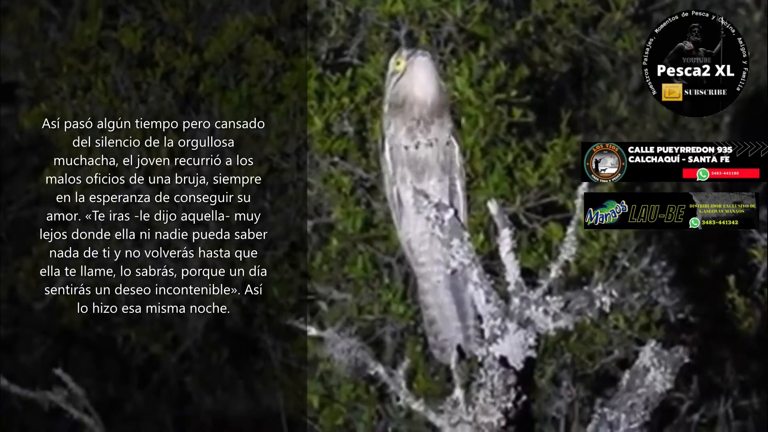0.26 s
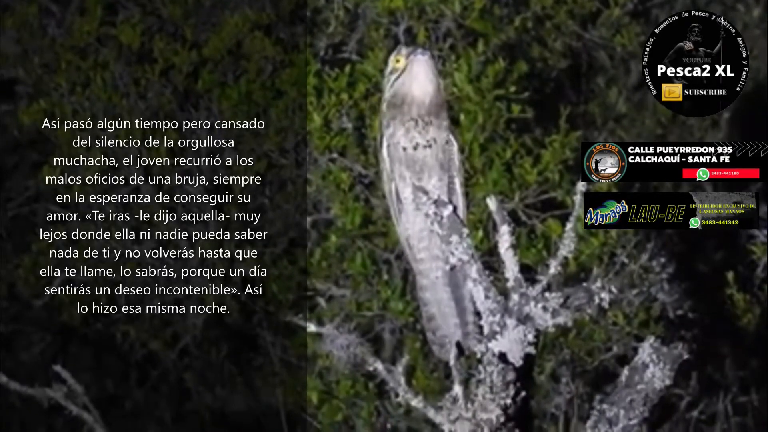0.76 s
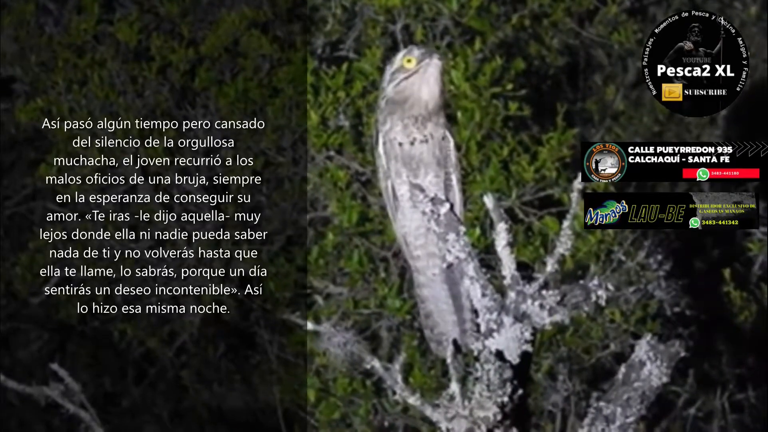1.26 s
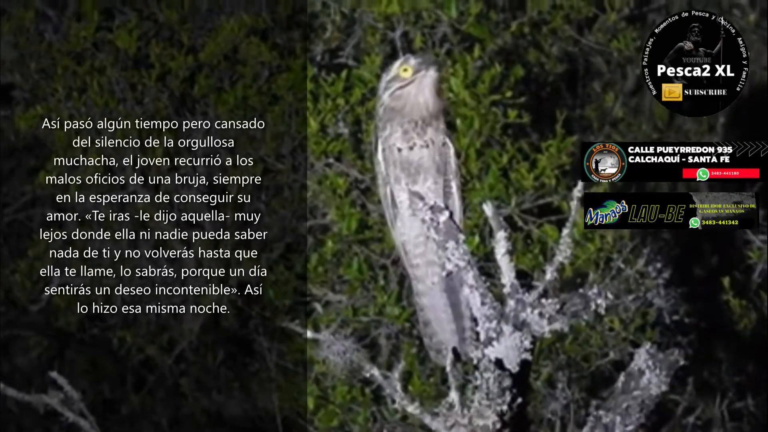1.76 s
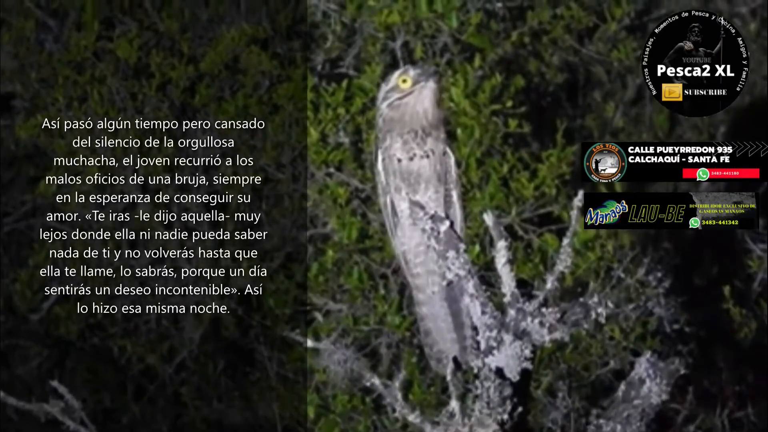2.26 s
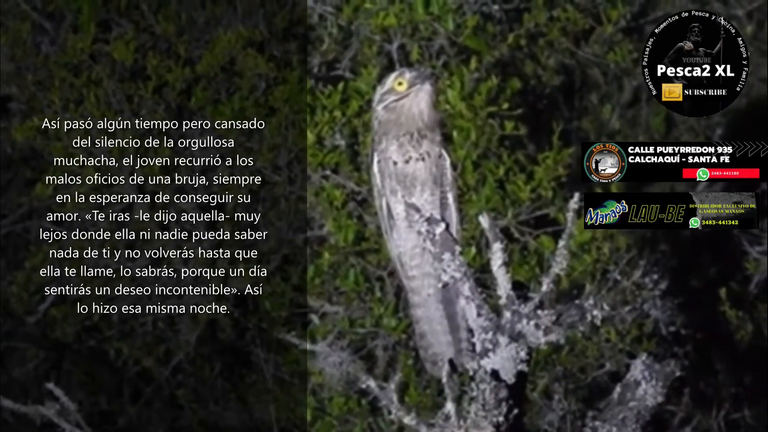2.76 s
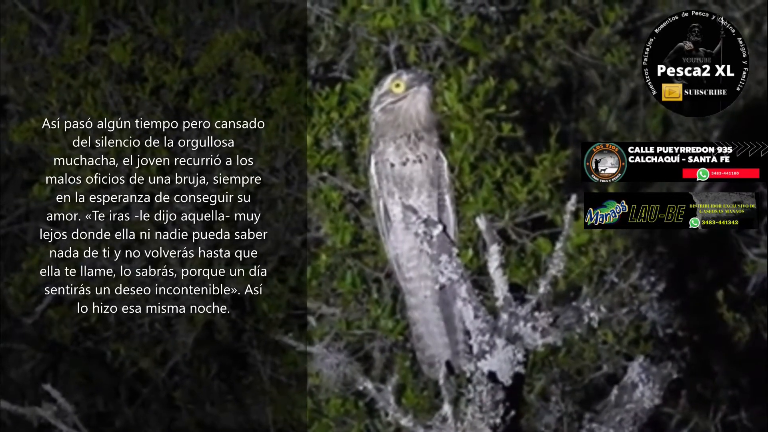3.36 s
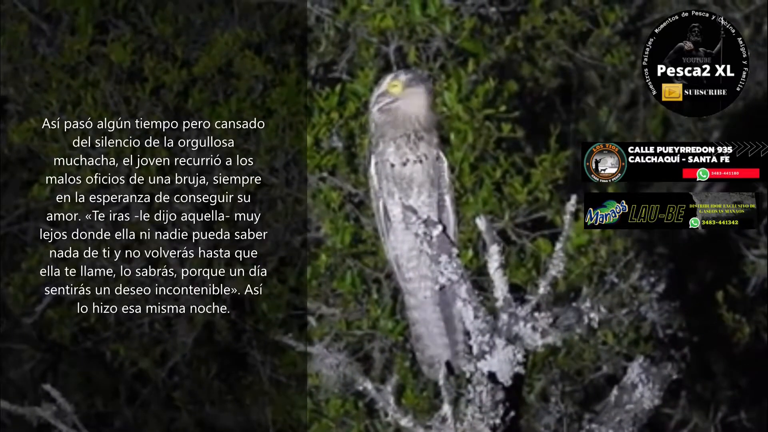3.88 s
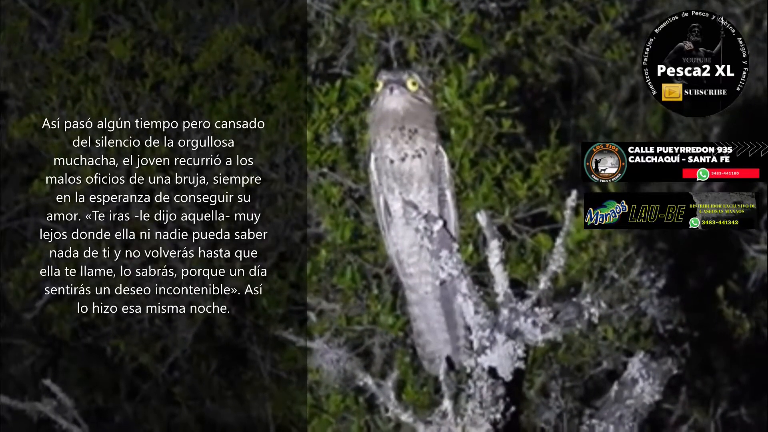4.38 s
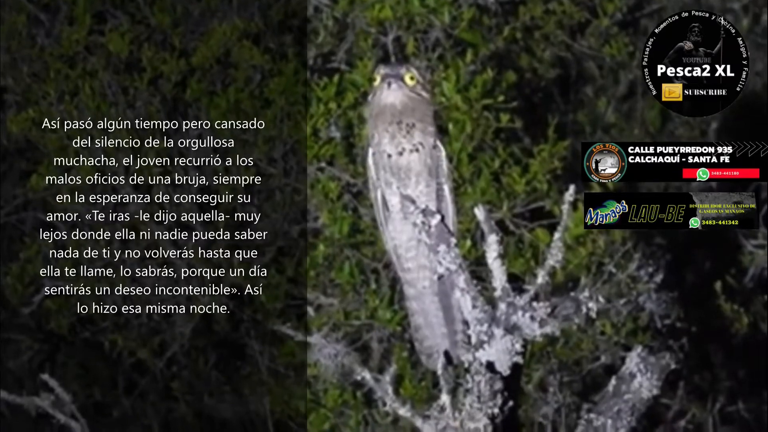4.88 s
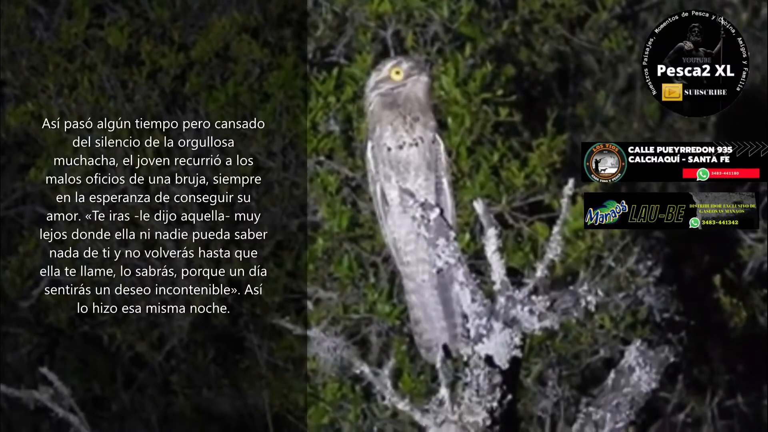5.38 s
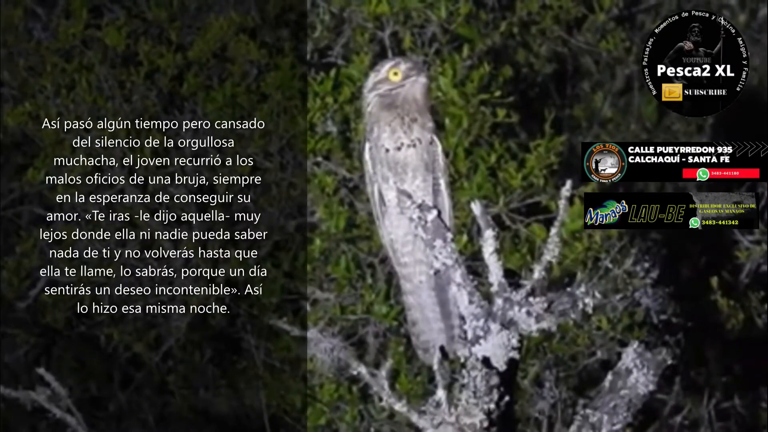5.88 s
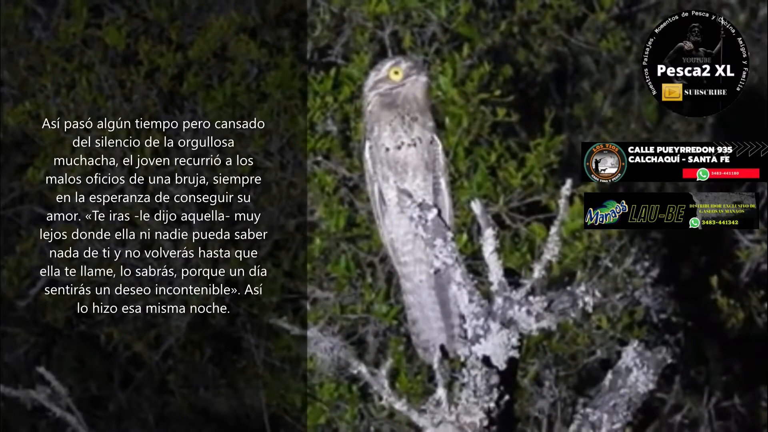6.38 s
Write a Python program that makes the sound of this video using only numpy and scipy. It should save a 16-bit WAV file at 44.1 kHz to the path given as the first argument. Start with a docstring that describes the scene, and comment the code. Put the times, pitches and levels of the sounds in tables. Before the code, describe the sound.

Outdoors at night, a bird gives three clear, nearly pure whistles descending in steps during the first second and a half, the first already sounding at the start and loudest. Faint gulping scoops precede the second and third. Bright crickets chirp quickly throughout, about six short pulsing bursts a second, over a dense far chorus. Barely audible low hoots come later. Stereo microphone in open woodland, with slight tree echo.

```python
"""A night bird whistles three falling notes in a wood: nearly pure sliding tones, with faint gulping
scoops before the second and third, and trees that send the sound back.
Crickets chirp in short tones, one for each wing stroke; shaped noise makes the farther chorus.
A distant owl-like bird hoots and purrs in low tones with soft pulses. Filtered noise makes the night
hiss, wind rumble, low wash and faint far singers; short pulses make one dull knock and treble flickers."""
import sys
import numpy as np
from scipy import signal
from scipy.io import wavfile
from scipy.ndimage import uniform_filter1d

SR = 44100
rng = np.random.default_rng(int(sys.argv[2]) if len(sys.argv) > 2 else 0)


def waveform_to_disk(signal):
    """Save audio, clipped to [-1, 1], as 16-bit WAV at the path in sys.argv[1]."""
    frames = np.transpose(np.atleast_2d(signal))
    scaled = np.clip(frames, -1, 1) * 32767
    samples = np.round(scaled).astype(np.int16)
    wavfile.write(sys.argv[1], SR, samples)


N = 292383  # length in samples

# Held part of each whistled note: (t/s, f/Hz, rms level/dB)
HELD_NOTES = [
    [(0.0, 894, -19), (0.026, 882, -18), (0.136, 916, -21), (0.213, 914, -19.5)],
    [(0.434, 744, -32), (0.462, 748, -30.5), (0.606, 750.7, -29.5), (0.66, 757, -32), (0.774, 730, -32),
     (0.823, 761, -32)],
    [(1.076, 640, -33), (1.226, 647, -33.5), (1.47, 606, -39), (1.503, 603, -39)],
]
# Swell into every note: (t/s from the start of the held part, pitch factor, level change/dB)
NOTE_SWELL = [(-.044, .975, -23), (-.03, .985, -10), (-.015, .995, -3)]
# Downward break after every note: (t/s from the end of the held part, pitch factor, level change/dB)
NOTE_BREAK = [(.008, .95, -3.5), (.015, .87, -10.5), (0.02, .84, -40)]
# How far each note breaks downward: (share of the common drop), one per note
BREAK_DEPTHS = [.45, 1.33, 0.73]
# Octave above each note, compared with the note at its loudest: (level/dB), one per note
NOTE_OCTAVES = [-65.5, -33.5, -29.5]
# Faint scoops before notes: (start t/s, length/s, reference f/Hz, level change/dB)
SCOOPS = [(0.31, 0.089, 739, 0.5), (0.941, .097, 625, -0.5)]
# Shape of a scoop, a gulp then a thin rise: (share of length, share of reference f, level before flutter/dB)
SCOOP_SHAPE = [(0, 0.4, -59), (.08, 0.43, -48.5), (.24, 0.52, -48.5), (.33, .6, -62), (.5, .76, -65),
               (.6, 0.82, -48), (.75, .9, -58), (1, 0.94, -52.5)]
# Tree trunks throw the whistle back: (delay t/s, level/dB)
TRUNK_ECHOES = [(.075, -26), (.12, -38), (.18, -43)]

# Very distant insects and frogs: (f/Hz, bandwidth/Hz, rms level/dB, rough burst rate/Hz)
FAINT_SINGERS = [(7500, 85, -52, 14), (4065, 130, -67, 12), (3820, 300, -70, 10), (1040, 170, -68, 10),
                 (675, 200, -70, 10)]
# How alike noise is at the two ears: (f/Hz, likeness from 0 to 1)
EAR_LIKENESS = [(30, .5), (120, .1), (500, .55), (1000, .6), (2000, .5), (4000, .3), (6800, .65),
                (7700, .75), (9000, .75)]
# Colour of the night hiss: (f/Hz, relative level/dB)
AIR_COLOUR = [(60, -20), (100, -34.5), (140, 2), (200, 3.5), (500, -3), (890, -2), (1240, -3.5), (1690, 1),
              (1950, -3), (2250, -3), (2850, -5.5), (3500, -1.5), (4100, 1.5), (5500, -9.5), (8500, -23),
              (12000, -15.5), (15500, -23)]
# Colour of light wind on the microphone: (f/Hz, relative level/dB)
WIND_COLOUR = [(10, -2), (30, -12), (70, -6), (110, -9.5), (150, -0.5), (250, -37)]
# The wind drops and returns: (t/s, level/dB)
WIND_LEVEL = [(0, -66), (1.4, -66.5), (1.8, -73.5), (5.2, -76), (5.6, -75.5), (6.63, -72)]
# Colour of the countless far crickets: (f/Hz, relative level/dB)
CHORUS_COLOUR = [(2650, -68), (4500, -40.5), (6010, -20.5), (6400, -9), (6670, -7.5), (6870, -3.5),
                 (7150, -6), (7430, -16), (7760, -21), (8600, -44.5), (11200, -84), (18900, -120)]
# Colour of a lower insect rasp on the left: (f/Hz, relative level/dB)
RASP_COLOUR = [(3500, -44.5), (4500, -20), (5200, -4), (5800, 3.5), (6300, 1), (6650, 3.5), (7000, -12),
               (8000, -57.5)]

# Near cricket's chirps: (t/s of first full wing stroke, number of full strokes, base level/dB)
CHIRPS = [(0.0709, 4.74, -20.5), (0.2318, 5.5, -21.5), (0.3906, 4.83, -19), (0.557, 4.8, -20),
          (0.7323, 4.8, -22), (0.9008, 5.1, -20.5), (1.0673, 4.9, -20.5), (1.23, 6.2, -23),
          (1.4935, 4.86, -21), (1.6683, 5.5, -23), (1.8509, 5.6, -22), (2.0405, 5.1, -20),
          (2.216, 4.7, -21), (2.3922, 5.03, -20.5), (2.5671, 5.06, -20.5), (2.735, 6.4, -22.5),
          (2.91, 4.8, -20.5), (3.093, 4.5, -21), (3.2749, 4.7, -21.5), (3.4516, 5.7, -20.5),
          (3.6109, 6.1, -20.5), (3.7931, 4.65, -21), (3.9611, 5, -22), (4.1288, 5.4, -21.5),
          (4.3034, 6.2, -21), (4.485, 6, -21), (4.668, 4.7, -22.5), (4.8276, 5.5, -21.5),
          (4.987, 5.05, -19), (5.1612, 5.95, -22), (5.3363, 5.5, -21.5), (5.4951, 4.93, -20),
          (5.6703, 6.3, -21.5), (5.8523, 4.2, -22), (6.0203, 5.6, -19.5), (6.2024, 6.2, -21),
          (6.384, 4.87, -20.5), (6.5588, 5.1, -21.5)]
# One wing stroke, whose wing file slows at the end: (t/s, f/Hz before pitch factors, relative level/dB)
WING_STROKE = [(-.0043, 7070, -14), (-.003, 7010, -2.5), (0, 6900, 0), (.002, 6710, -2), (.0036, 6430, -7),
               (.0052, 5950, -16)]
# Neighbours in loose step: (lag t/s, looseness/s, pitch factor, base level/dB, left-right level/dB, left lead/s)
NEIGHBOURS = [(-.025, .03, .985, -27, -1.5, .000066), (.08, .03, 1.005, -31.5, -2.5, -.00001)]

# One dull knock and very short treble flickers: (t/s, level/dB, f/Hz)
SHORT_PULSES = [(4.588, -33, 710), (.2577, -22.5, 12050), (1.107, -30, 12000), (2.738, -31, 12000),
                (4.016, -30, 11900), (5.551, -34, 12000), (5.906, -31.5, 12000)]
# Distant hoots and purrs: (start t/s, length/s, base f/Hz, rms level before the tail/dB, purr from 0 to 1)
HOOTS = [(1.552, 0.051, 334, -58, 0.9), (1.796, 0.135, 342.6, -54.5, 0.13), (3.355, 0.046, 496, -59.5, 0.2),
         (3.427, 0.15, 350, -61.5, 1), (3.605, 0.053, 354, -59, 0.4), (3.839, 0.12, 338.6, -52, 0.05),
         (3.949, 0.08, 348, -62.5, 0.6), (5.636, 0.036, 347, -60, 0.4), (5.701, 0.125, 354, -60.5, 0.84),
         (5.978, 0.14, 340, -55, 0), (6.131, 0.038, 353, -61, 0.2)]
# Colour of the low wash: (f/Hz, relative level/dB)
WASH_COLOUR = [(250, -29.5), (420, 2), (700, 6), (1100, 6.5), (1500, -19.5), (3000, -60.5)]
# The wash rises and fades: (t/s, level/dB)
WASH_LEVEL = [(3.25, -76), (3.4, -57), (3.65, -59), (3.85, -64), (5.1, -62), (5.9, -72), (6.2, -76)]

AIR_DB, AIR_CHANGE_DB, AIR_EASE_S = -53, -3, 0.069  # hiss level, brief level change, time to ease
CHORUS_DB, RASP_DB = -35.5, -41.5
CHORUS_SWELL_DB, CHORUS_BLUR_S = 0.5, 0.062  # swing of the swell, time to ease
STROKE_S = .01445  # seconds from one wing stroke to the next
OPENING_DB = -8  # first stroke against the chirp's base level
STROKE_SPREAD_DB = 1.2  # chance in the strength of single strokes
THROBS_PER_S = 33.3  # soft pulses in a purr
EDGE_HZ = 15750  # the recorder's upper limit


def amp(db):
    """Turns decibels into a plain multiplier."""
    return 10 ** (np.asarray(db) / 20)


def evened(x):
    """Scales a sound to an rms strength of one."""
    return x / np.sqrt(np.mean(x ** 2) + 1e-20)


def read(points, hz):
    """Reads a curve between its points, along a logarithmic frequency scale."""
    f, value = np.transpose(points)
    return np.interp(np.log(hz + 1), np.log(f + 1), value)


def along(curve):
    """Turns a level curve into a multiplier for every sample."""
    s, db = np.transpose(curve)
    return amp(np.interp(np.arange(N) / SR, s, db))


def add(mix, s, sound):
    """Adds a sound at time s, cutting off what falls outside the mix."""
    at = round(s * SR)
    sound = sound[..., max(-at, 0):]
    part = mix[..., max(at, 0):][..., :sound.shape[-1]]
    part += sound[..., :part.shape[-1]]


def narrow_noise(width, size):
    """Complex noise that wanders slowly, in a band about width Hz wide around zero."""
    r = np.exp(-np.pi * width / SR)
    raw = [1, 1j] @ rng.standard_normal((2, size))
    z = signal.lfilter([1], [1, -2 * r, r * r], raw)
    return z / np.sqrt(np.mean(abs(z) ** 2))


def hiss(spectrum, patchy_db, lead_s):
    """Two-channel noise from random short spectra with drifting patches; left leads by lead_s."""
    frames, hz = N // 256 + 5, np.fft.rfftfreq(1024, 1 / SR)
    a, b, c, d, patches = rng.standard_normal((frames, 513, 5)).T
    patches = uniform_filter1d(patches, size=10, axis=0)  # smooth over frequency
    patches = evened(uniform_filter1d(patches, size=10, axis=1))  # then over time
    same = np.clip(read(EAR_LIKENESS, hz), -1, 1)[:, None]
    late = np.exp(-2j * np.pi * hz * lead_s)[:, None]
    left = a + 1j * b
    right = same * late * left + np.sqrt(1 - same ** 2) * (c + 1j * d)
    z = np.array([left, right])
    z *= amp(read(spectrum, hz)[:, None] + patchy_db * patches)
    noise = signal.istft(z, nperseg=1024, noverlap=768)[1]
    return evened(noise[:, :N])


def scatter(x, t60, start_s):
    """Leaves and trunks return a fading tail, different at each ear; it falls 60 dB in t60 seconds."""
    t = np.arange(SR // 2) / SR
    taps = rng.standard_normal((2, len(t))) * amp(-60 * t / t60) * (t > start_s)
    return signal.fftconvolve(x[None], taps / np.linalg.norm(taps[0]), axes=1)[:, :N]


def note(held, depth):
    """Puts the common swell before a held note and the downward break after it."""
    first, last = held[0], held[-1]
    swell = [(first[0] + s, first[1] * factor, first[2] + db) for s, factor, db in NOTE_SWELL]
    fall = [(last[0] + s, last[1] * factor ** depth, last[2] + db) for s, factor, db in NOTE_BREAK]
    return swell + held + fall


def whistle(rows, octave_db, breathy):
    """A sliding pure tone with an octave that grows with loudness; breathy tones flutter."""
    s, hz, db = np.transpose(rows)
    t = np.arange(s[0], s[-1], 1 / SR)
    turn = np.exp(2j * np.pi * np.cumsum(np.interp(t, s, hz)) / SR)
    flutter = 1 - breathy + breathy * narrow_noise(170, len(t))
    level = amp(np.interp(t, s, db))
    octave = amp(octave_db) * level / level.max() * turn ** 2  # squaring doubles the pitch
    return s[0], np.sqrt(2) * level * (flutter * turn + octave).imag


def night_bird():
    """Whistled notes and scoops ring among trees, with separate echoes and a scattered tail."""
    dry = np.zeros(N)
    for rows, octave_db, depth in zip(HELD_NOTES, NOTE_OCTAVES, BREAK_DEPTHS):
        add(dry, *whistle(note(rows, depth), octave_db, breathy=0.017))
    for s, length_s, hz, scoop_db in SCOOPS:
        rows = [(s + share * length_s, part * hz, db + scoop_db) for share, part, db in SCOOP_SHAPE]
        add(dry, *whistle(rows, octave_db=-14, breathy=.5))
    out = dry * amp([[-.3], [.3]])  # slightly to the right
    out += amp(-34.0) * scatter(dry, t60=0.78, start_s=0.017)
    for delay_s, db in TRUNK_ECHOES:
        add(out, delay_s, amp(db) * dry)
    return out


def faint_singers():
    """Wavering narrow bands of noise come and go in uneven bursts, partly alike at both ears."""
    out, t = np.zeros((2, N)), np.arange(N) / SR
    for hz, width, db, per_s in FAINT_SINGERS:
        bursts = np.maximum(narrow_noise(per_s, N).real + 1.25, 0)
        carrier = np.exp(2j * np.pi * hz * t)
        one = (narrow_noise(width, N) * carrier).real
        other = (narrow_noise(width, N) * carrier).real
        out += amp(db) * evened(bursts * np.array([one, 0.87 * one + 0.17 * other]))
    return out


def air():
    """Coloured noise makes the night hiss; its level changes briefly a few times."""
    t = np.arange(N) / SR
    spans = sum((t >= held[0][0]) * (t < held[-1][0]) * 1. for held in HELD_NOTES)
    change_db = AIR_CHANGE_DB * uniform_filter1d(spans, round(AIR_EASE_S * SR))
    return amp(AIR_DB + change_db) * hiss(AIR_COLOUR, patchy_db=1.87, lead_s=0)


def wind():
    """Low noise makes the rumble of light wind, which drops and returns."""
    return along(WIND_LEVEL) * hiss(WIND_COLOUR, patchy_db=0.5, lead_s=0)


def chorus():
    """Many far crickets blur into noise that swells with the near chirps; a lower rasp joins in."""
    t = np.arange(N) / SR
    chirping = sum((t >= s - STROKE_S) * (t < s + STROKE_S * strokes) * 1. for s, strokes, _ in CHIRPS)
    swell_db = CHORUS_SWELL_DB * (uniform_filter1d(chirping, round(CHORUS_BLUR_S * SR)) - .5)
    far = amp(CHORUS_DB + swell_db) * hiss(CHORUS_COLOUR, patchy_db=2.0, lead_s=.000005)
    rasp = amp(RASP_DB) * hiss(RASP_COLOUR, patchy_db=1.56, lead_s=.000055)
    return far + rasp


def stroke(pitch, phase, lead_s):
    """One wing stroke is a short tone sliding down; its waves reach the left ear lead_s early."""
    s, hz, db = np.transpose(WING_STROKE)
    t = np.arange(s[0], s[-1], 1 / SR)
    level = amp(uniform_filter1d(np.interp(t, s, db), size=30))
    level *= signal.windows.tukey(len(t), .3)  # soft ends
    f = pitch * np.interp(t, s, hz)
    turn = 2 * np.pi * (np.cumsum(f) / SR + phase)
    half_lead = np.pi * f * lead_s
    return level * np.sin([turn + half_lead, turn - half_lead])


def cricket(chirps, pitch, pan_db, lead_s):
    """A chirp is a weak, flat opening wing stroke, then even strokes that swell and sharpen slightly."""
    out = np.zeros((2, N))
    for (first, strokes, db), luck in zip(chirps, rng.standard_normal((len(chirps), 9, 4))):
        count = round(strokes)
        times = first + STROKE_S * np.arange(-1, count)
        swell_db = -1.0 + 2.0 * np.sin(np.linspace(0, 2.2, count))
        levels_db = db + np.r_[OPENING_DB, swell_db]
        pitches = pitch * np.r_[.965, np.linspace(.99, 1.006, count)]
        # Chance shifts the time, strength, pitch and phase of each stroke.
        for s, level_db, factor, (late, loud, sharp, phase) in zip(times, levels_db, pitches, luck):
            tone = stroke(factor * (1 + 0.0029 * sharp), phase, lead_s)
            start_s = s + WING_STROKE[0][0] + 0.0002 * late
            add(out, start_s, amp(level_db + STROKE_SPREAD_DB * loud) * tone)
    return out * amp([[pan_db / 2], [-pan_db / 2]])


def crickets():
    """The near cricket and its loosely timed neighbours ring, and leaves scatter their sound."""
    out = cricket(CHIRPS, 1.0, pan_db=1.2, lead_s=.000016)
    for lag_s, loose_s, pitch, db, pan_db, lead_s in NEIGHBOURS:
        # a negative lag puts a neighbour ahead of the near chirps on average
        starts = np.array(CHIRPS)[:, 0] + lag_s + loose_s * rng.standard_normal(len(CHIRPS))
        neighbour_chirps = [(s, 5, db) for s in starts[starts < N / SR]]
        out += cricket(neighbour_chirps, pitch, pan_db, lead_s)
    return out + amp(-12.5) * scatter(out.mean(0), t60=0.23, start_s=0.0024)


def short_pulses():
    """Each pulse is about one cycle of a wave under a bell-shaped fade, with no ring."""
    out = np.zeros(N)
    t = np.arange(-150, 150) / SR
    for s, db, hz in SHORT_PULSES:
        fade = np.exp(-(t * hz / 0.57) ** 2)
        add(out, s - 150 / SR, amp(db) * np.cos(2 * np.pi * hz * t + 0.54) * fade)
    return out


def far_bird():
    """Low soft tones swell and fade; purrs throb and carry overtones."""
    out = np.zeros(N)
    for s, length_s, hz, db, purr in HOOTS:
        t, purr = np.arange(0, length_s, 1 / SR), np.clip(purr, 0, 1)
        arch = 1 + 0.09 * np.exp(-t / .02) - 0.084 * t  # pitch settles from above and sags
        turn = np.exp(2j * np.pi * np.cumsum(hz * arch) / SR)
        voice = turn + purr * (amp(-5) * turn ** 2 + amp(-8) * turn ** 3)
        throb = 1 - purr * np.cos(np.pi * THROBS_PER_S * t) ** 2
        flutter = .9 + .1 * narrow_noise(40, len(t))
        swell = np.sin(np.pi * t / length_s) ** (.75 - .5 * purr)
        add(out, s, amp(db) * evened((voice * flutter).real * throb * swell))
    return out + amp(-11.5) * scatter(out, t60=0.28, start_s=0.029)


def wash():
    """Low coloured noise, barely there at first, rises like a passing wash and fades."""
    return along(WASH_LEVEL) * hiss(WASH_COLOUR, patchy_db=2.5, lead_s=0)


def scene():
    """Adds the birds, insects, air and short pulses together."""
    birds = night_bird() + far_bird()
    insects = faint_singers() + chorus() + crickets()
    return birds + insects + air() + wind() + short_pulses() + wash()


def record(dry):
    """A filter removes the highest treble, as the recorder's band limit does."""
    lowpass = signal.firwin(511, EDGE_HZ, window=("kaiser", 9), fs=SR)
    return signal.oaconvolve(dry, lowpass[None], "same")


dry = scene()
out = record(dry)
waveform_to_disk(out)
```